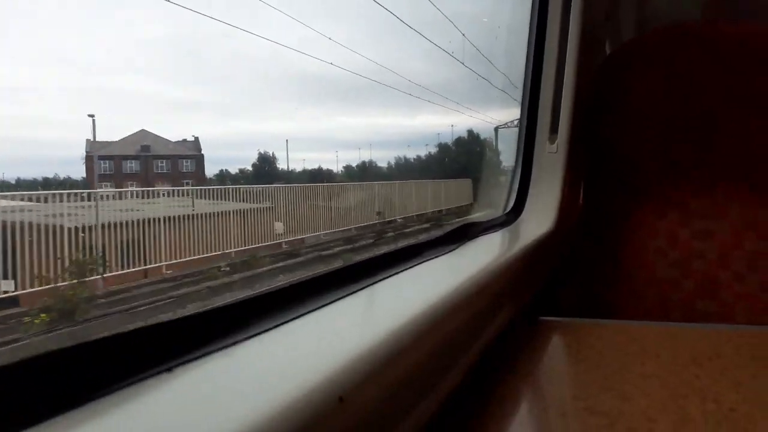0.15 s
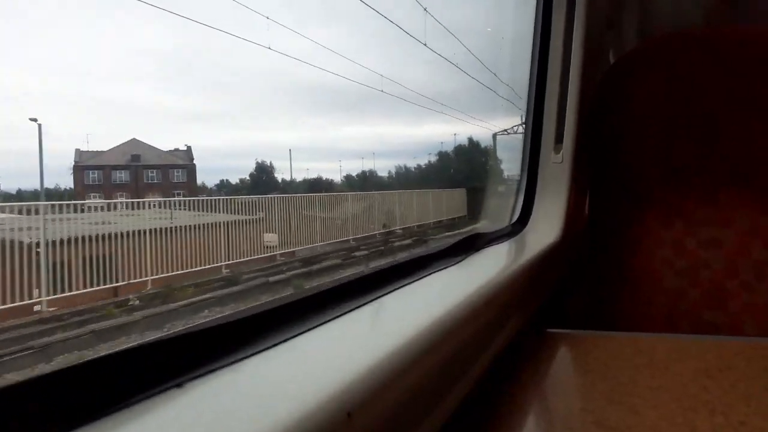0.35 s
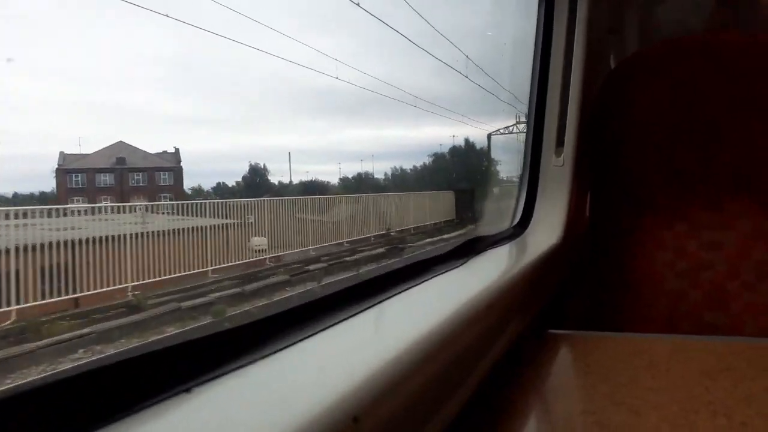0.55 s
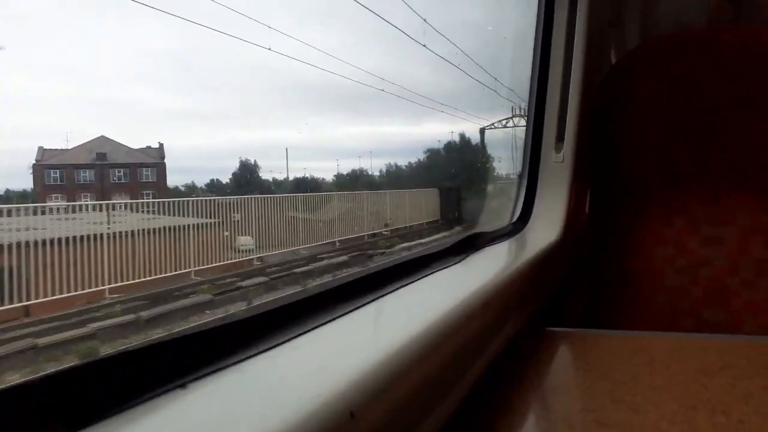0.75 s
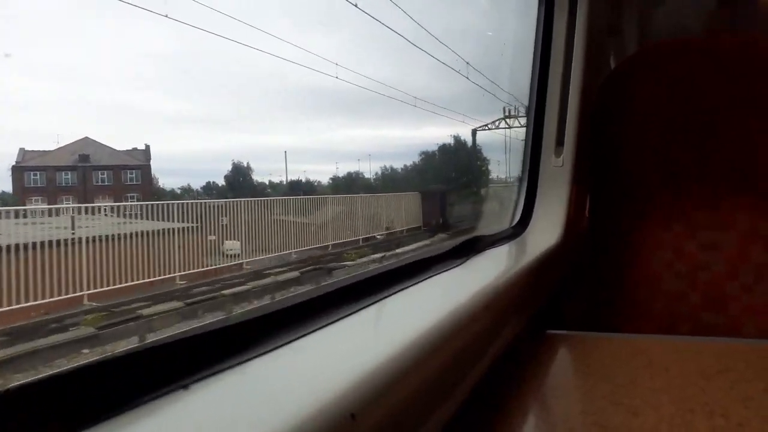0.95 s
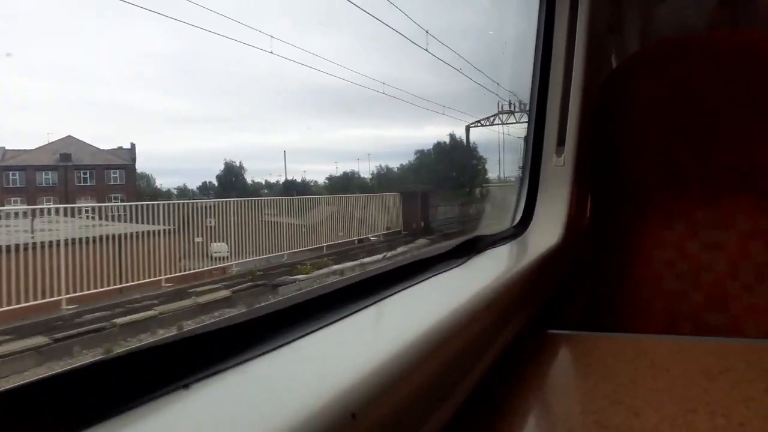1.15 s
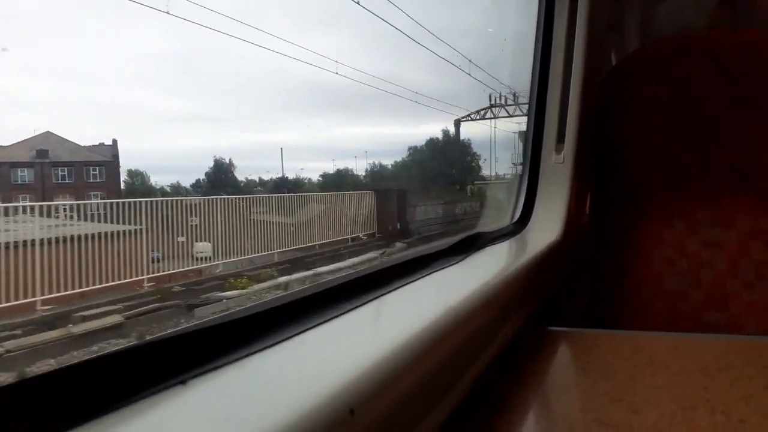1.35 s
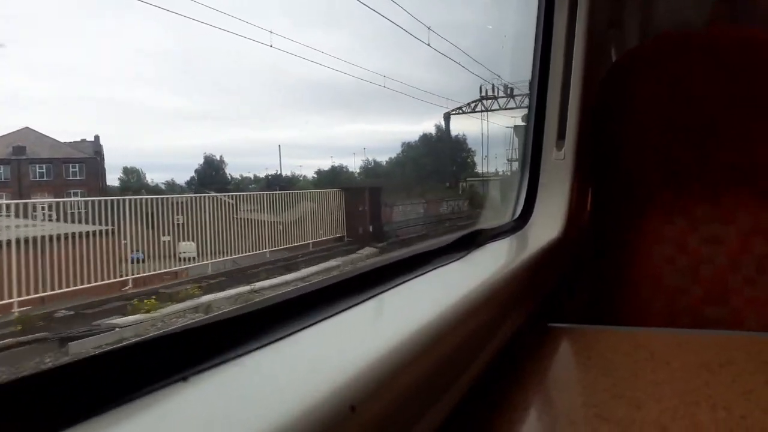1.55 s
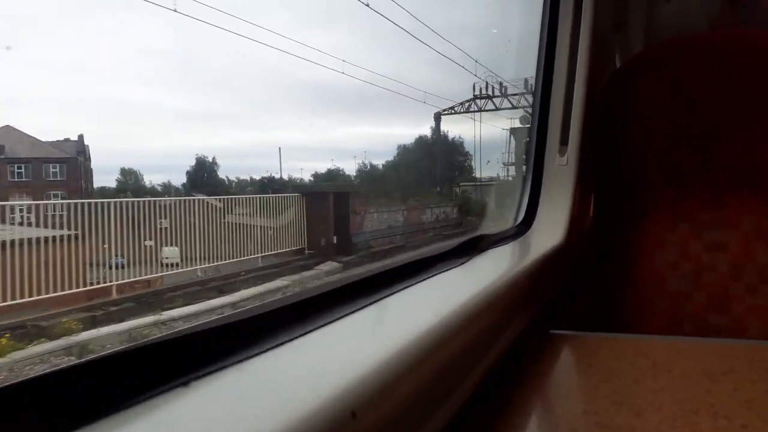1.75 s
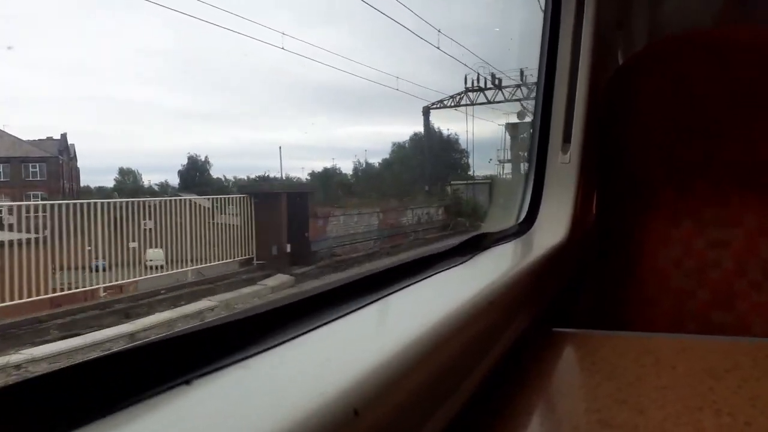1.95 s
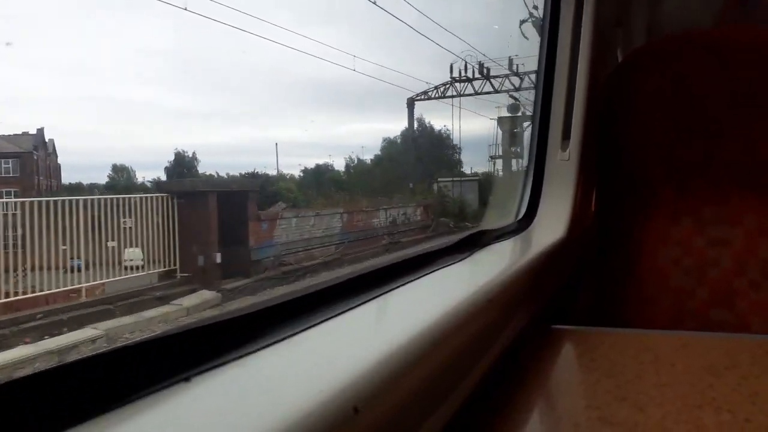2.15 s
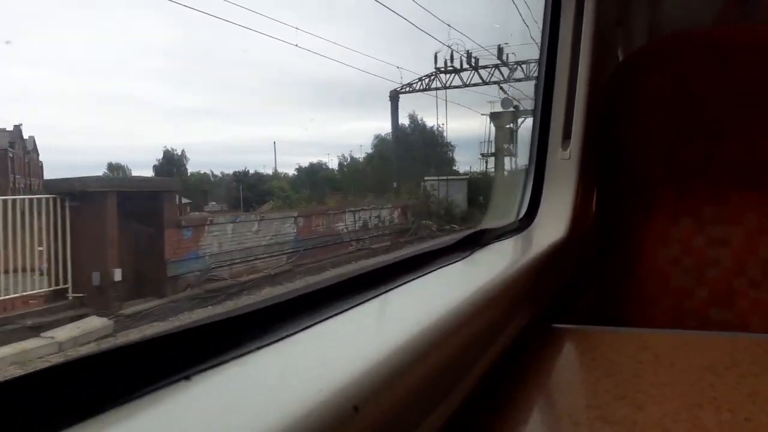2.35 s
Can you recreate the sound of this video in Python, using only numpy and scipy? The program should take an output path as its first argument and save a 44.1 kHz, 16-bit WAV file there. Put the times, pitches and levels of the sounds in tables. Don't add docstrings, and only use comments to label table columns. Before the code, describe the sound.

Electric train carriage rumbles and booms from inside, wheels thudding over rail joints, trim clacking softly

```python
import sys
import numpy as np
from scipy import signal
from scipy.io import wavfile
from scipy.ndimage import uniform_filter1d

SR = 44100
rng = np.random.default_rng(int(sys.argv[2]) if len(sys.argv) > 2 else 0)


def unload_wav(signal):
    wavfile.write(
        sys.argv[1],
        SR,
        np.round(np.clip(np.atleast_2d(signal).T, -1, 1) * 32767).astype(np.int16),
    )


def volts(x):
    e = np.asarray(x, float) / 20
    return 10 ** e


N = 110250
T = np.arange(N) / SR


def evened(x):
    return x / np.sqrt(np.mean(x ** 2) + 1e-20)


def read(points, hz):
    point_hz, value = np.transpose(points)
    return np.interp(np.log(hz + 1), np.log(point_hz + 1), value)


def noise(colour, patchy_db=0., steep_db=30, size=1024):
    # pitch_hz, side_minus_mid_db
    spread = [(40, -20.5), (90, -24), (180, -21), (350, -7.5), (600, -8), (1400, 0), (5000, -0.5),
              (15000, 1)]
    # pitch_hz, left_minus_right_db
    balance = [(60, -0.15), (180, 1.5), (350, 0.1), (700, 0.5), (2800, -3), (6000, -1.5), (15000, -1)]
    frames, hz = 4 * N // size + 5, np.fft.rfftfreq(size, 1 / SR)
    a, b, c, d, patches = rng.standard_normal((5, len(hz), frames))
    patches = uniform_filter1d(patches, size=9, axis=0)
    patches = evened(uniform_filter1d(patches, size=9, axis=1))
    same = (2 / (1 + volts(2 * read(spread, hz))) - 1)[:, None]
    left = a + 1j * b
    right = same * left + np.sqrt(1 - same ** 2) * (c + 1j * d)
    right = right / volts(read(balance, hz))[:, None]
    if callable(colour):
        gain = colour(hz)
    else:
        octaves_below = np.maximum(np.log2(colour[0][0] / (hz + 1)), 0)
        gain = volts(read(colour, hz) - steep_db * octaves_below)
    z = np.array([left, right]) * gain[:, None] * volts(patchy_db * patches)
    return evened(signal.istft(z, nperseg=size, noverlap=size - size // 4)[1][:, :N])


def mode(hz, width_hz):
    return lambda f: 1 / (1 + (2 * (f - hz) / width_hz) ** 2)


def blow(start_s, db, rise_s, t60_s):
    since_s = np.maximum(T - start_s, 0)
    fall_db = 60 * np.maximum(since_s - rise_s, 0) / t60_s
    return np.minimum(since_s / rise_s, 1) * volts(db - fall_db)


def stroke(start_s, db, length_s):
    tail_s = 0.03
    swell = np.clip((T - start_s) / (0.32 * length_s), 0, 1)
    fade = np.exp(-np.maximum(T - start_s - 0.75 * length_s, 0) / tail_s)
    return volts(db) * swell * fade


def curve(points):
    return volts(np.interp(T, *np.transpose(points)))


def hiss(loudness_db):
    # pitch_hz, level_db
    hiss_colour = [(2500, -0.5), (3300, -36.5), (3900, -3.5), (4800, -16), (8800, -15.5), (9800, -25),
                   (15600, -27)]
    return noise(hiss_colour, 2.6, 18) * volts(loudness_db)


def ticks():
    # start_s, level_db
    snaps = [
        (1.4377, -58),
        (1.4964, -50),
        (2.0812, -55.5),
    ]
    snap_noise = noise(mode(6000, 9000), size=256)
    return snap_noise * sum(blow(s, db - 2.5, 0.00055, 0.042) for s, db in snaps)


def whine():
    # pitch_hz, level_db, from_s, to_s
    motor_tones = [
        (507, -44, .35, .8),
        (590, -49, 1.6, 2.5),
        (1485, -65, 0, 2.5),
        (3856, -75, 0, 2.5),
    ]
    right_db = 6
    waver = 1 + .0015 * evened(uniform_filter1d(rng.standard_normal(N), size=4000))
    turns_per_hz = np.cumsum(waver) / SR
    tones = 0
    for hz, db, from_s, to_s in motor_tones:
        fade = np.clip(np.minimum(T - from_s + 0.12, to_s + 0.074 - T) / 0.13, 0, 1)
        tones = tones + volts(db) * np.sin(2 * np.pi * hz * turns_per_hz) * fade
    return np.array([-tones / volts(right_db), tones * volts(right_db / 2)])


def scuffs():
    # start_s, level_db, length_s
    rubs = [
        (1.713, -58.5, 0.036),
        (1.744, -57.5, 0.032),
        (1.95, -68.5, 0.047),
        (2.31, -70, 0.025),
        (2.387, -56.5, 0.036),
        (2.431, -51.5, 0.057),
    ]
    # pitch_hz, level_db
    rub_colour = [(1530, -48), (2600, -16), (3530, -3), (4550, -9.5), (6180, -11), (6920, -16), (8210, -16),
                  (9610, -22.5), (15500, -31.5)]
    return noise(rub_colour, 1.5, 40, size=512) * sum(stroke(*rub) for rub in rubs)


def clacks():
    # start_s, level_db, brightness (0-1), t60_s
    trim_knocks = [(0.221, -64, 1, 0.38), (.293, -63, 0.6, 0.78), (.346, -66.5, 0.7, 0.23),
                   (0.371, -46, 0.2, 0.16), (0.397, -63.5, 0.65, 0.3), (0.46, -65.5, 0.7, 0.76),
                   (0.565, -41, 0.2, 0.22), (0.753, -62, 1, 0.14), (1.095, -43.5, 0.02, 0.25),
                   (1.168, -66.5, 1, 0.13), (1.383, -75.5, 0.3, .2), (1.493, -58.5, 0.8, 0.42),
                   (1.546, -60.5, 0.7, 0.34), (1.629, -63.5, 0.8, 0.35)]
    # start_s, level_db, brightness (0-1), length_s
    rustles = [
        (0.017, -70, 0.96, 0.17),
        (0.601, -58.5, 0.3, .06),
        (0.649, -53.5, 0.4, 0.068),
        (0.992, -68.5, 1, 0.2),
        (1.42, -58, 0, 0.15),
        (1.548, -59, 0, 0.045),
        (2.096, -58, 0.4, 0.075),
        (2.157, -60.5, 0.1, 0.08),
    ]
    # pitch_hz, level_db
    dull_colour = [(900, -5), (1600, -2), (2200, -2.5), (3000, -6.5), (5000, -15), (8500, -31),
                   (10000, -27), (15500, -37.5)]
    # pitch_hz, level_db
    bright_colour = [(1500, -32.5), (3500, -6.5), (5200, -8.5), (6200, -8), (8500, -10.5), (9600, -20.5),
                     (15500, -26.5)]
    chatter_db, rise_s = 1.0, .002
    chatter = volts(chatter_db * evened(uniform_filter1d(rng.standard_normal(N), size=120)))
    dull = noise(dull_colour, 3., size=2048)
    bright = noise(bright_colour, 3., size=2048)
    brightness = np.clip([row[2] for row in trim_knocks + rustles], 0, 1)
    hits = [blow(s, db, rise_s, max(t60_s, .02)) for s, db, _, t60_s in trim_knocks]
    hits += [stroke(s, db, length_s) for s, db, _, length_s in rustles]
    return chatter * (dull * np.dot(1 - brightness, hits) + bright * np.dot(brightness, hits))


def uneven_hum():
    # pitch_hz, level_db, from_s, to_s
    low_hum = (506, -43, .86, 1.13)
    hz, db, from_s, to_s = low_hum
    waver = evened(signal.oaconvolve(rng.standard_normal(N), np.hanning(2500) ** 2, "same"))
    fade = np.clip(np.minimum(T - from_s, to_s - T) / 0.031, 0, 1)
    return np.sqrt(2) * volts(db + 4.5 * waver) * np.sin(2 * np.pi * hz * T) * fade


def rings():
    # start_s, level_db, pitch_hz, t60_s
    trim_rings = [(0.373, -55, 2420, 0.068), (.568, -64, 2250, 0.078), (0.571, -56, 3030, 0.074),
                  (0.569, -56, 6220, .07), (.567, -63, 7860, .07), (.579, -57.5, 6820, .08),
                  (.598, -53.5, 2325, 0.14), (0.667, -50, 2380, 0.059), (.666, -64, 7700, 0.063),
                  (0.671, -57, 6120, 0.076), (1.096, -53, 3670, 0.08), (1.098, -55, 1670, 0.095),
                  (1.101, -62, 4850, 0.043), (1.108, -49, 2090, 0.05), (1.121, -53, 2640, 0.074),
                  (1.444, -53.5, 1633, 0.17), (1.469, -59.5, 2540, 0.22), (1.495, -63, 4050, .05),
                  (1.742, -61, 3510, 0.13), (1.752, -54, 3630, 0.11), (2.117, -57.5, 2135, 0.096),
                  (2.124, -66, 4400, 0.09), (2.127, -78, 3700, .05), (2.186, -54, 1610, .12)]
    # start_s, level_db, pitch_hz, t60_s
    wall_rings = [(.425, -41, 493, 0.11), (.43, -38, 630, 0.096), (.585, -40, 498, 0.086),
                  (.59, -41.5, 719, 0.22), (.59, -43.5, 872, 0.17), (.745, -30, 334, 0.12),
                  (.765, -43.5, 735, 0.17), (.975, -32, 341.7, 0.18), (.985, -39, 706, .12),
                  (1.045, -45.5, 613, 0.26), (1.93, -45.5, 590, 0.12), (2.043, -57, 590, 0.083)]
    rise_turns, grain_db = 5, 3
    lag_radians = 1.3
    out = np.zeros((2, N))
    for s, db, hz, t60_s in trim_rings + wall_rings:
        lag = np.array([[0], [lag_radians * min(hz / 1000, 1) ** 2]])
        tone = np.sin(2 * np.pi * hz * (T - s) - lag)
        out += np.sqrt(2) * blow(s, db, rise_turns / hz, max(t60_s, .02)) * tone
    grain = evened(signal.oaconvolve(rng.standard_normal(N), np.hanning(500) ** 2, "same"))
    return out * volts(grain_db * grain)


def thuds():
    # start_s, level_db
    joints = [
        (0.13, -24),
        (0.433, -24),
        (0.586, -20),
        (0.845, -32),
        (0.992, -23),
        (1.05, -44),
        (1.28, -20.5),
        (1.32, -28),
        (1.459, -21),
        (1.521, -24.5),
    ]
    # pitch_hz, level_db
    thud_colour = [(150, -2.5), (300, -10.5), (630, -21.5), (880, -27), (1600, -39.5), (2500, -50),
                   (3500, -71)]
    thud_db, rise_s, t60_s = -6.5, 0.021, 0.55
    return noise(thud_colour, 5.9, 7) * sum(blow(s, db + thud_db, rise_s, t60_s) for s, db in joints)


def lurches():
    # start_s, level_db, pitch_hz
    axle_blows = [(0.109, -20.5, 79.7), (0.442, -26.5, 129.5), (0.539, -27, 116.6), (0.589, -19.5, 86),
                  (0.609, -21.5, 146.6), (0.861, -29, 117), (.94, -22.5, 119.1), (0.991, -26, 87.5),
                  (1.035, -16, 125), (1.065, -17, 148.9), (1.138, -16.5, 118.6), (1.149, -26, 71.2),
                  (1.191, -13, 95.8), (1.275, -24, 225.6), (1.279, -14.5, 136.7), (1.305, -17, 150.6),
                  (1.329, -22.5, 236), (1.347, -16, 111.3), (1.391, -19, 118), (1.458, -10.5, 137.8),
                  (1.495, -18.5, 237.8), (1.505, -14, 85), (1.528, -11, 129.8), (1.559, -21, 82.7),
                  (1.602, -14.5, 99.9), (1.634, -24.5, 222.7), (1.678, -19, 96.4), (1.728, -20.5, 98),
                  (1.809, -21, 91.2), (1.851, -24.5, 129.2), (2.019, -19.5, 124.7), (2.058, -23.5, 94.3),
                  (2.171, -20, 110), (2.228, -20.5, 95.3), (2.308, -18.5, 96), (2.39, -25, 93.8),
                  (2.471, -27, 92.6)]
    rise_s, t60_s, sag = .008, .25, .08
    out = 0
    for s, db, hz in axle_blows:
        since_s = T - s
        sagging = 1 - sag * np.clip(since_s / t60_s, 0, 1)
        ring = np.sin(2 * np.pi * hz * since_s * sagging)
        out = out + np.sqrt(2) * blow(s, db, rise_s, t60_s) * ring
    return out


def wheel_roar():
    # time_s, level_db
    wheel_level = [(0, -35), (.2, -36.5), (.36, -36.5), (.7, -36), (1.0, -34.5), (1.25, -34.5), (1.55, -38),
                   (1.75, -38.5), (2.1, -40), (2.5, -39)]
    # pitch_hz, level_db
    roar_colour = [(60, -23), (200, -23), (340, -17), (450, -27.5), (600, -30), (1300, -46), (2600, -59.5),
                   (6000, -80.5)]
    return noise(roar_colour, 1.2, size=2048) * curve(wheel_level) * volts(3.5)


def floor_ring():
    # time_s, level_db
    floor_level = [(0, -27), (.13, -47), (.25, -36), (.9, -32.5), (1.3, -24), (1.52, -17.5), (1.75, -20.5),
                   (2.0, -26), (2.35, -21.5), (2.43, -31.5)]
    hz, width_hz, pure = 68.97, 5.5, .7
    rumble = noise(mode(hz, width_hz), size=8192)
    tone = np.sqrt(2) * np.sin(2 * np.pi * hz * T)
    return ((1 - pure) * rumble + pure * tone) * curve(floor_level)


def body_boom():
    # time_s, level_db
    roughness = [(0, -28), (.5, -31.5), (.9, -26), (1.1, -27.5), (1.25, -26.5), (1.35, -16), (1.55, -22.5),
                 (1.75, -29), (2.0, -30.5), (2.3, -28.5), (2.5, -30)]
    # pitch_hz, width_hz, level_db
    body_modes = [(52.4, 38, -2), (102.8, 19.3, 2.5), (120.4, 33, -1.5), (147.8, 21.2, 0.5),
                  (210.6, 96, -7.5), (335.2, 20, -17)]

    def body_gain(f):
        return np.sqrt(sum((volts(db) * mode(hz, width_hz)(f)) ** 2 for hz, width_hz, db in body_modes))

    return noise(body_gain, size=8192) * curve(roughness)


def scene():
    small = ticks() + whine() + scuffs() + clacks() + uneven_hum() + rings()
    return small + thuds() + lurches() + wheel_roar() + floor_ring() + body_boom()


def top_cut(x):
    return signal.sosfilt(signal.butter(12, 15730, fs=SR, output="sos"), x)


def record(dry):
    knee_db, squeeze, recover_db_per_s = -25, .42, .5
    power_db = 10 * np.log10(abs(uniform_filter1d((dry ** 2).mean(0), size=8000)) + 1e-12)
    fall_db = T * recover_db_per_s
    held_db = np.maximum.accumulate(power_db + fall_db) - fall_db
    over_db = uniform_filter1d(np.maximum(held_db - knee_db, 0), size=2000)
    low_cut = signal.butter(6, 40, "high", fs=SR, output="sos")
    opening = volts(-2 * np.exp(-T / .012))
    heard = signal.sosfilt(low_cut, dry) * opening + hiss(-66.5 - squeeze * over_db)
    return top_cut(heard)


dry = scene()
out = record(dry)
unload_wav(out)
```